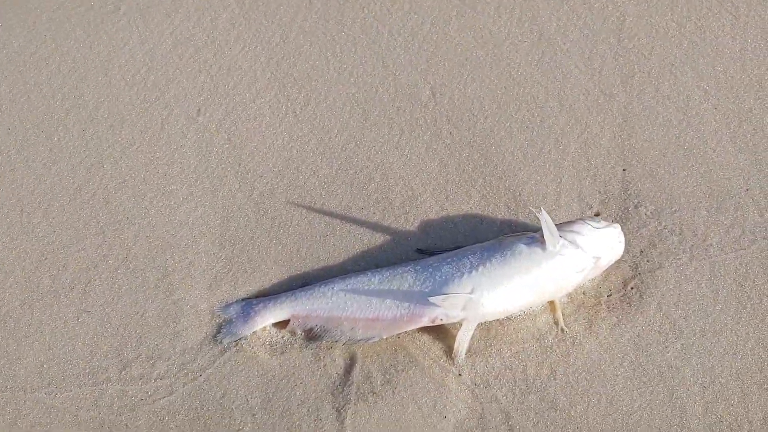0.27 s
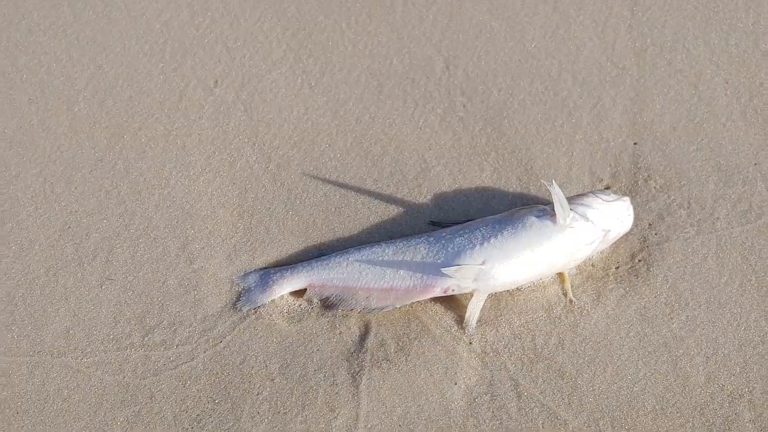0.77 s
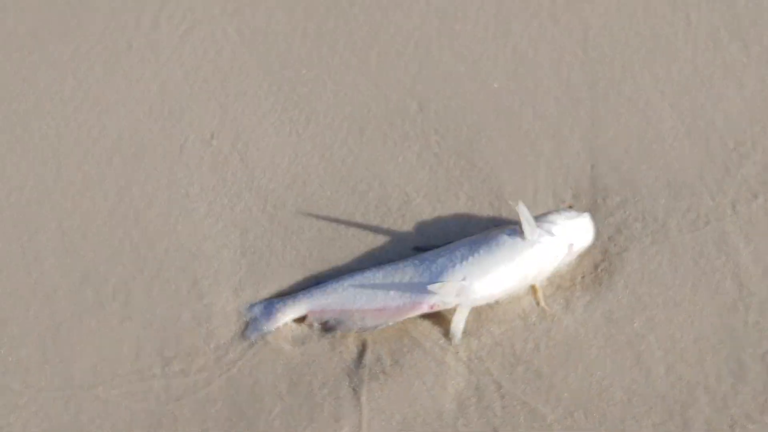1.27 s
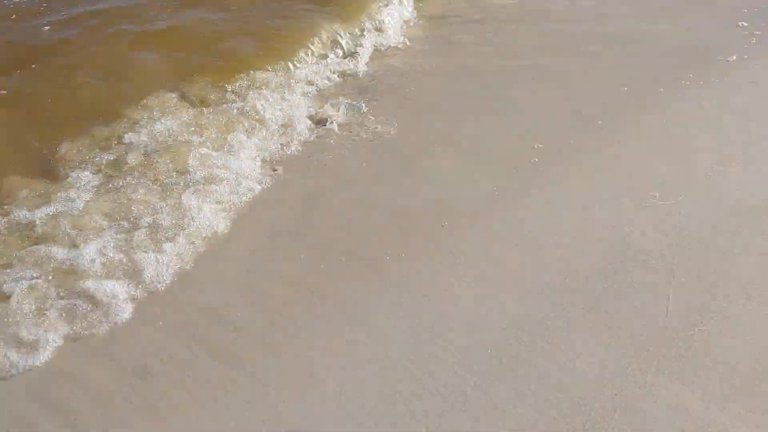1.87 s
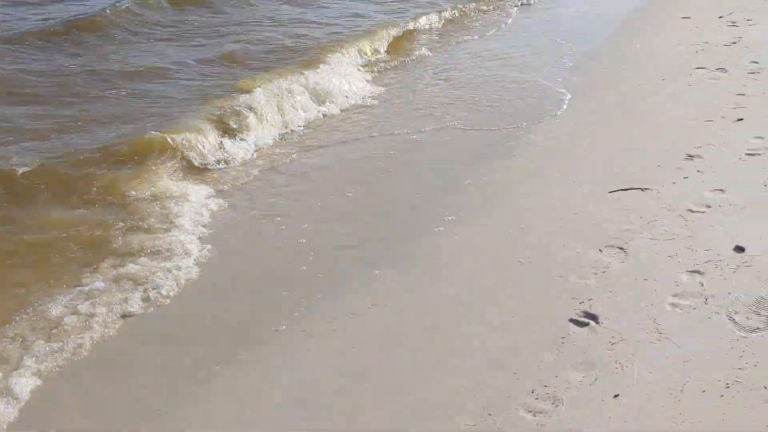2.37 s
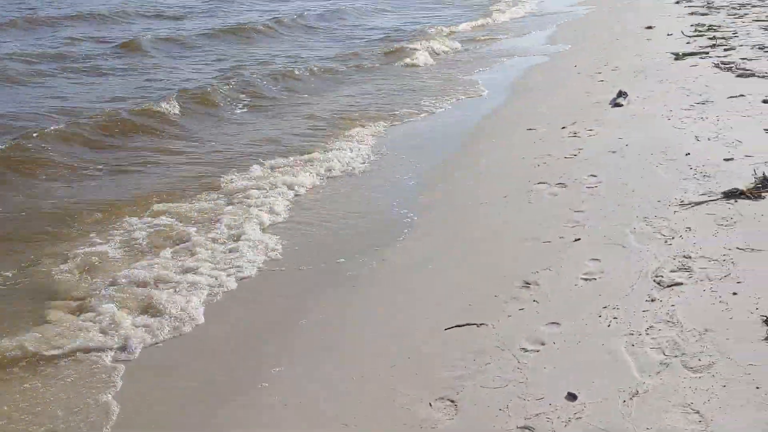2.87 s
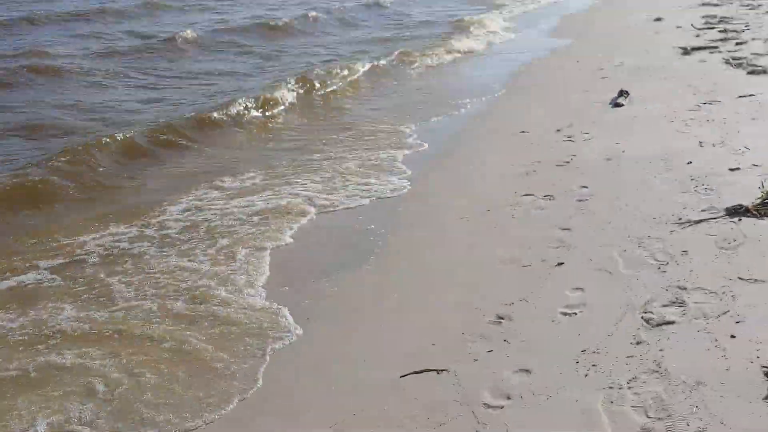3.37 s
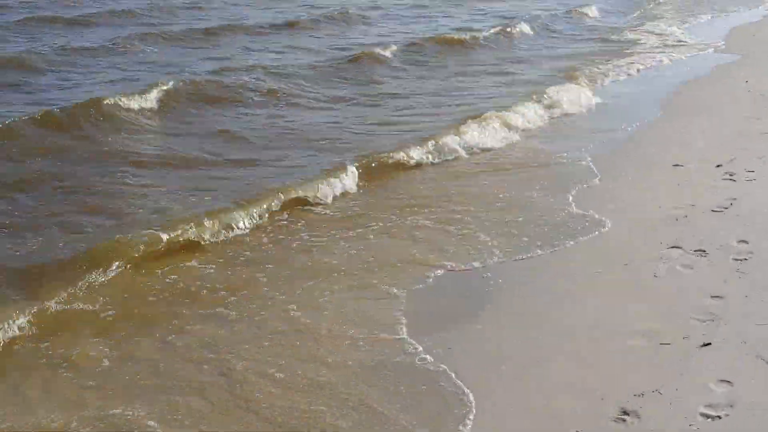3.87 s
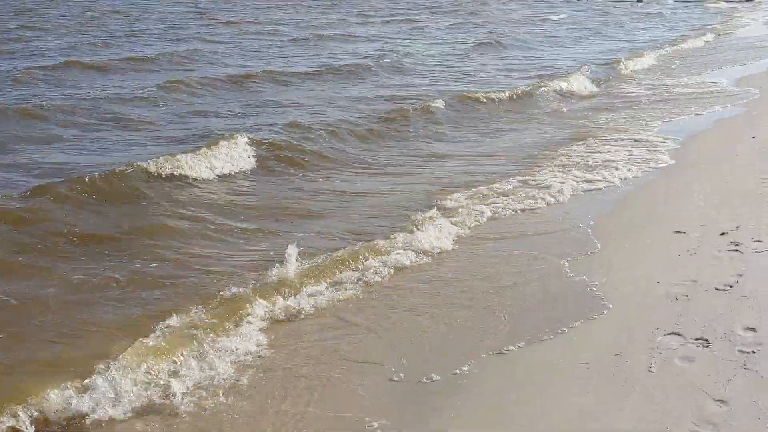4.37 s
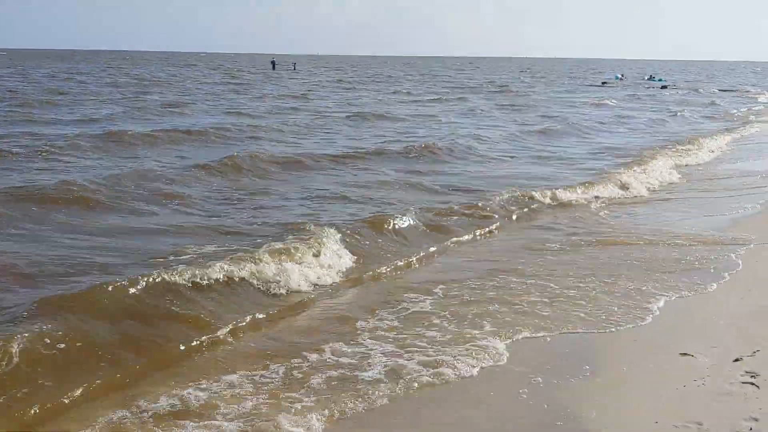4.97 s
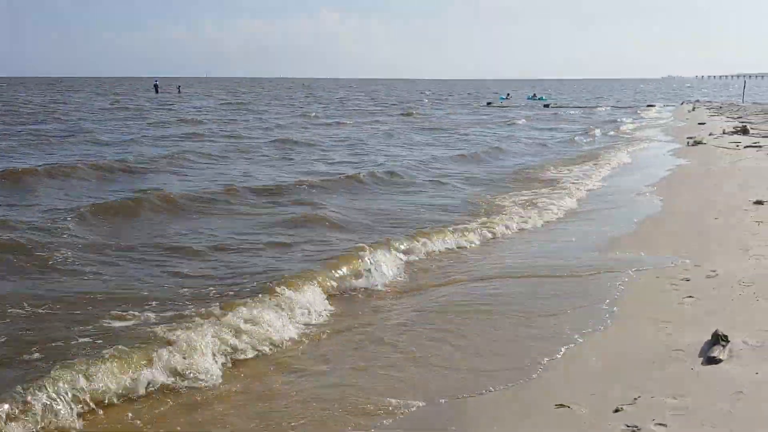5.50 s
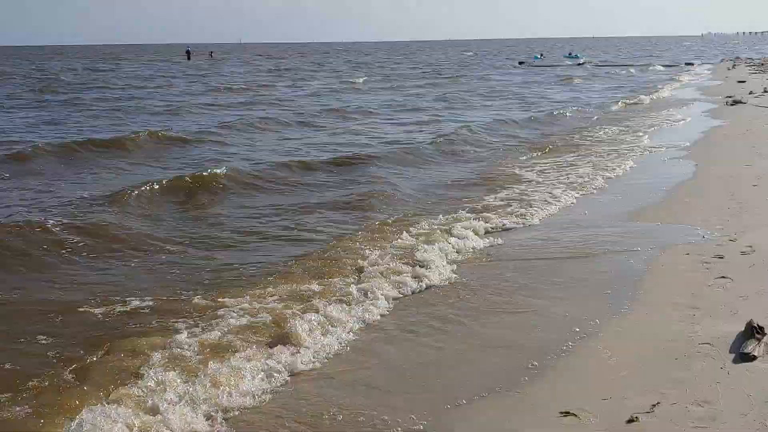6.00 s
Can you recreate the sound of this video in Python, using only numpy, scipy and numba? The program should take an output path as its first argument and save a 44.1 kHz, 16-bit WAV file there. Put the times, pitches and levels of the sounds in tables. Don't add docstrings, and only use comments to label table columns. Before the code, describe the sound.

Small waves break and fizz up a sandy beach in quick overlapping washes, while wind thumps and buffets the microphone, strongest after the middle.

```python
import sys
import numpy as np
from scipy import signal
from scipy.fft import rfft, irfft
from scipy.io import wavfile
from scipy.ndimage import uniform_filter1d, map_coordinates
from numba import njit

SR = 44100
rng = np.random.default_rng(int(sys.argv[2]) if len(sys.argv) > 2 else 0)


def digitize_waveform(pressure):
    field = np.atleast_2d(pressure).T
    bounded = np.clip(field, -1, 1)
    quanta = np.round(bounded * 32767).astype(np.int16)
    wavfile.write(sys.argv[1], SR, quanta)


def attenuation_scalar(level_db):
    decades = np.asarray(level_db, float) / 20
    return 10 ** decades


N = 275184

# crest t/s, length/s, foam level/dB, force/dB (drives plunge and spray), share breaking close by [0-1]
WAVES = [(0.067, 0.5, -21, -5.5, 0.18), (0.93, 0.043, -41.5, 10.5, 0.4), (1.035, 0.14, -28, 0.5, 0.77),
         (1.246, 0.15, -25.5, -1.5, 0.3), (1.436, 0.14, -20, -8.5, 0.5), (1.72, 0.42, -25.5, -6.5, 0.91),
         (2.147, 0.21, -25, -6.5, 0.89), (2.484, 0.2, -27.5, -4, 0.62), (2.761, 0.19, -35.5, 3, 0.8),
         (3.182, 0.12, -27, -14, 0.76), (3.45, 0.33, -26.5, -15, 0.58), (3.87, 0.28, -29.5, 0.5, 0.6),
         (4.35, 0.51, -31, 1.5, 0.78), (4.735, 0.18, -32, 1, 0.4), (5.076, 0.19, -28.5, 1, 0.38),
         (5.393, 0.21, -32, 2.5, 0.52), (5.624, 0.19, -39.5, 2, 0.6), (5.845, 0.32, -30.5, 5.5, 0.54),
         (6.12, 0.19, -35.5, 5.5, 1)]
# t/s, right echo delay/ms, left echo delay/ms, left echo strength [0-1]
LIFT = [(0, 2.4, 2.6, .15), (1.25, 2.33, 2.5, .25), (1.5, 1.9, 2.2, .45), (1.75, 1.27, 1.55, .6),
        (2.0, .9, 1.22, .7), (2.2, .72, 1.04, .7), (2.36, .64, .82, .75), (2.52, .6, .73, .75),
        (2.75, .55, .76, .6), (3.0, .46, .75, .55), (3.3, .48, .76, .4), (3.7, .49, .76, .4),
        (4.1, .47, .77, .6), (4.5, .46, .73, .55), (5.1, .45, .74, .5), (5.5, .43, .77, .45),
        (5.9, .44, .76, .75)]
# t/s, peak level/dB, f/Hz
AIR_POCKETS = [
    (0.631, -22.5, 570),
    (0.988, -22.5, 516),
    (1.126, -13, 2210),
    (1.29, -21.5, 537),
    (1.32, -17, 603),
    (1.359, -18.5, 848),
    (1.409, -18, 454),
    (1.744, -24, 1330),
    (1.797, -24, 934),
    (1.989, -28.5, 770),
]
# t/s, peak level/dB, f/Hz
SPRAY_DROPS = [
    (.825, -0.5, 5000),
    (.868, 2, 6210),
    (1.058, -4, 4570),
    (1.07, 12, 11000),
    (1.268, 0, 4300),
    (1.299, 4, 4570),
    (1.372, -8, 11000),
    (1.618, 11, 11000),
    (3.623, 7.5, 6270),
]
# f/Hz, level/dB
LEFT_PORT = [(170, 0.5), (330, -2.5), (600, 1), (950, -0.5), (1350, -2.5), (1900, -3.5), (2500, -5.5),
             (3300, -8.5), (4000, -11.5), (5200, -12), (6100, -14), (7000, -24), (7800, -22), (8400, -43),
             (8900, -32), (9300, -33), (9800, -20.5), (10400, -33), (11000, -23), (12100, -21.5),
             (12600, -40), (14100, -34), (15100, -38)]
RIGHT_PORT = [(170, -8), (350, -7), (650, -2.5), (1250, -2), (1900, 6.5), (2700, 3), (3500, 1.5),
              (4800, -8), (6200, -13), (7000, -8.5), (8600, -31.5), (9800, -32.5), (10400, -25.5),
              (11000, -22.5), (12100, -32), (12700, -40), (14100, -32), (15100, -41)]
# f/Hz, level/dB
EDDY_RESPONSE = [(20, -11.5), (40, -1), (70, 0.5), (300, 3.5), (1000, -47.5)]
# t/s, length/s, buffet level/dB, small eddies re all/dB
LEFT_GUSTS = [(0.2, 0.11, -30.5, -7), (0.496, 0.11, -36.5, -8.5), (.9, 0.061, -33, -11),
              (1.07, 0.035, -24, -10.5), (1.2, 0.04, -24.5, -9.5), (1.424, 0.11, -26, -6.5),
              (1.607, .07, -29.5, -6), (1.74, 0.052, -32, -4.5), (1.95, 0.056, -29, -14.5),
              (2.404, 0.3, -31, -16), (2.71, 0.059, -27, -13), (3.05, 0.19, -29, -14.5),
              (3.27, .05, -31, -10.5), (3.684, 0.059, -25, -8.5), (3.78, .07, -21, -13),
              (3.98, 0.16, -17.5, -8), (4.454, 0.17, -20.5, -11.5), (4.69, 0.054, -28.5, -4),
              (4.85, 0.069, -18.5, -9), (5.037, 0.052, -17.5, -4.5), (5.132, 0.058, -12.5, -0.5),
              (5.36, 0.18, -19, -11), (5.94, 0.17, -19.5, -7.5), (6.195, 0.055, -27, -4)]
RIGHT_GUSTS = [(1.42, 0.088, -27.5, 6.5), (1.72, 0.032, -32, -1), (1.83, .04, -34, -18),
               (2.16, 0.11, -32.5, -2), (2.3, 0.039, -28, 5), (2.449, 0.062, -30.5, -2),
               (2.58, 0.12, -24, -12), (2.8, 0.098, -27, -7.5), (3.002, 0.07, -22, -7.5),
               (3.21, 0.055, -21.5, -9), (3.3, 0.068, -26, 0), (3.42, 0.2, -22.5, -15),
               (3.62, 0.1, -26.5, -9), (3.82, 0.07, -22, -11.5), (4.2, 0.31, -24.5, -8.5),
               (4.7, .2, -23, -9.5), (4.92, 0.034, -19, -12.5), (5.08, 0.072, -14, -1.5),
               (5.25, 0.038, -19, -5.5), (5.48, 0.35, -21, -10), (5.95, 0.17, -27, -7),
               (6.2, 0.11, -24, -9)]
# t/s, peak level/dB, f/Hz
LEFT_SLAPS = [(0.174, -11, 99), (0.756, -15, 89), (0.923, -14, 79), (1.063, -11, 109), (1.093, -13, 100),
              (1.177, -8.5, 110), (1.474, -14, 150), (1.569, -9, 99), (1.597, -14, 140), (1.635, -10, 129),
              (1.667, -12, 118), (1.722, -14, 129), (1.932, -19, 89), (2.081, -11, 171), (2.435, -15, 150),
              (2.946, -18, 110), (3.179, -14, 130), (3.323, -23, 130), (3.651, -16, 120), (3.736, -8, 110),
              (3.833, -6, 140), (3.899, -1, 151), (4.0, -2, 159), (4.044, -0.5, 119), (4.127, -3, 162),
              (4.184, -15, 110), (4.347, -6, 111), (4.445, -5, 138), (4.612, -10, 111), (4.858, -15, 140),
              (4.933, -4, 150), (5.005, -3, 192), (5.048, 0.5, 211), (5.149, -4, 230), (5.248, -8, 130),
              (5.339, -7, 152), (5.788, -15, 160), (5.849, -7, 180), (6.181, -2.5, 169)]
RIGHT_SLAPS = [(0.328, -20, 200), (1.461, -13, 250), (1.699, -19, 200), (1.803, -22, 92), (2.079, -10, 191),
               (2.174, -18, 90), (2.206, -17, 120), (2.457, -20, 80), (2.589, -17, 90), (2.765, -10, 90),
               (2.827, -12, 69.6), (3.028, -12, 150), (3.197, -12, 89), (3.23, -19, 160),
               (3.38, -7.5, 59.5), (3.415, -15, 70), (3.643, -15, 80), (3.768, -6, 90.5), (3.875, -12, 80),
               (4.426, -11, 190.8), (4.692, -15, 100), (4.925, -7, 90), (5.071, -5.5, 190),
               (5.241, -6, 222), (5.29, -12, 100), (5.533, -15, 90), (5.653, -7.5, 132), (6.141, -10, 139),
               (6.189, -15, 120)]
# t/s, length/s, centre f/Hz, right level/dB, left re right/dB
RAFTS = [(1.3, .1, 2300, -34, -3), (1.31, 0.09, 2350, -28.5, -8), (1.68, 0.092, 1150, -41, 10),
         (2.303, 0.058, 360, -30.5, 3), (2.49, 0.22, 1930, -23.5, -28), (2.65, 0.14, 4800, -33.5, -18),
         (2.88, 0.1, 460, -32, -2), (3.89, 0.24, 4400, -29.5, -15), (4.22, 0.23, 2240, -29, -10),
         (4.43, .15, 5100, -35, -6), (5.35, 0.13, 3300, -29.5, -9), (1.73, 0.036, 3200, -41, -10),
         (1.1, 0.19, 1200, -39, 3.5), (0.93, 0.057, 3360, -33, -9), (2.8, 0.084, 3900, -42, 1),
         (5.82, .12, 3100, -41, 4), (4.9, 0.25, 3150, -28, -13), (4.653, 0.14, 2400, -37, -9),
         (5.05, 0.089, 1850, -28, -9), (5.604, 0.11, 600, -26, -0.5), (5.7, 0.11, 3600, -27, -16),
         (5.852, 0.075, 2180, -25, -12), (5.847, .12, 6200, -29, -13), (5.9, 0.21, 1330, -38, 7.5),
         (6.08, 0.1, 3300, -31, -18)]

FALL_OVER_RISE = 0.9
PLUNGE_SPAN, SPRAY_SPAN = 0.73, 0.92
PLUNGE_PER_FORCE, SPRAY_PER_FORCE = 0.91, 0.98
FAR_PLUNGE_DB, FAR_FOAM_DB, FAR_SPRAY_DB = -35, -40, -39
PLUNGE_DB, SPRAY_DB = (-10, 3.5), (-1, -0.5)
PLUNGE_PAN_DB, FOAM_PAN_DB, SPRAY_PAN_DB = (-10, -1.9), (-1.5, 1.5), (3.5, 0.5)
BREAKER_LEAD_MS, WASH_LEAD_MS = (.17, .12), (.46, .41)
SHADOW_HZ = (2800., 1700.)
BREAKER_ECHO, WASH_ECHO = (.45, 1.15), (.1, .05)
SCATTERED = (.2, .22)
ECHO_CORNER_TURNS, ECHO_TOP_HZ = (.5, .12), 4200.
SHADOW_DELAY_MS, CLOTH_DELAY_MS = .08, .05


@njit
def svf(x, hz, damp):
    low, band = np.empty(len(x)), np.empty(len(x))
    b, l = 0., 0.
    for i in range(len(x)):
        g = np.tan(np.pi * hz[i] / SR)
        v = (b + g * (x[i] - l)) / (1 + g * (g + damp))
        low[i], band[i] = l + g * v, damp * v
        b, l = 2 * v - b, l + 2 * g * v
    return low, band


@njit
def bubbles(start, hz, cycles, size, glide):
    out = np.zeros(N)
    for k in range(len(start)):
        tau = cycles[k] * SR / hz[k] / 3
        phase = 0.
        for i in range(min(int(5 * tau), N - start[k])):
            phase += 2 * np.pi * hz[k] / SR * (1 + glide * i / tau)
            envelope = (1 - np.exp(-6 * i / tau)) * np.exp(-i / tau)
            out[start[k] + i] += size[k] * np.sin(phase) * envelope
    return out


def unit(x):
    return x / np.sqrt(np.mean(x ** 2))


def curves(table):
    s, *columns = np.transpose(table)
    return [np.interp(np.arange(N) / SR, s, c) for c in columns]


def walk(rate_hz):
    k = int(SR / rate_hz)
    held = np.repeat(rng.standard_normal(N // k + 1), k)
    return uniform_filter1d(uniform_filter1d(held, k), k)[:N]


def colour(x, table, size=2048):
    hz, db = np.transpose(table)
    grid_hz = np.arange(size // 2 + 1) * SR / size
    gain_db = np.interp(np.log(grid_hz + 1), np.log(hz), db)
    cep = irfft(np.log(attenuation_scalar(gain_db)))
    cep[1:size // 2] *= 2
    cep[size // 2 + 1:] = 0
    return signal.fftconvolve(x, irfft(np.exp(rfft(cep))))[:N]


def delay(x, ms):
    return map_coordinates(x, [np.arange(N) - ms * SR / 1000], order=3)


def swell(s, length_s, fall=0.92):
    late = np.arange(N) / SR - s[:, None]
    width = length_s[:, None] * np.where(late > 0, fall, 1)
    return np.exp(-(late / width) ** 2)


def total_db(db, shape, floor_db):
    return 10 * np.log10(attenuation_scalar(2 * db) @ shape + attenuation_scalar(2 * floor_db))


def lifted(echo_ms, pair):
    return np.interp(np.log(echo_ms), np.log([.5, 2.3]), pair[::-1])


def foam(fizz_db, patchy_db, count=60000):
    when, pitch, ring, rarity = rng.random((count, 4)).T
    hz = 300 + 13000 * pitch ** 1.53
    size = attenuation_scalar(-2.6 * np.log(rarity + .002))
    fizz = unit(bubbles((when * N).astype(np.int64), hz, 3 + 0.96 * ring, size, 0.043))
    layers, together = np.zeros((3, N)), walk(30)
    for band_hz in 130 * 2 ** np.arange(0, 7.1, 1 / 2):
        source = rng.standard_normal(N) + attenuation_scalar(fizz_db) * fizz
        band = svf(source, np.full(N, band_hz), .5)[1]
        flicker = min(band_hz / 5000, 1.2) * together + .5 * walk(9)
        band *= attenuation_scalar(patchy_db * flicker)
        place = np.interp(np.log(band_hz), np.log([700, 1300, 2900, 7500]), [0, 1, 1, 2])
        weight = np.clip(1 - abs(place - np.arange(3)), 0, 1)
        layers += weight[:, None] ** .5 * band
    return layers


def waves(echo_ms):
    s, length_s, db, force_db, share = np.transpose(WAVES)
    plunge_shape, foam_shape, spray_shape = (swell(s, length_s * span, FALL_OVER_RISE)
                                             for span in (PLUNGE_SPAN, 1, SPRAY_SPAN))
    plunge_db = total_db(db + PLUNGE_PER_FORCE * force_db, plunge_shape, FAR_PLUNGE_DB)
    foam_db = total_db(db, foam_shape, FAR_FOAM_DB)
    spray_db = total_db(db + SPRAY_PER_FORCE * force_db, spray_shape, FAR_SPRAY_DB)
    plunge_db += lifted(echo_ms, PLUNGE_DB)
    spray_db += lifted(echo_ms, SPRAY_DB)
    weight = attenuation_scalar(2 * db)[:, None] * foam_shape + 1e-12
    near_share = np.clip(share @ weight / weight.sum(axis=0), 0, 1)
    return np.array([plunge_db, foam_db - 3, spray_db + 13.5]), near_share


def at_left_port(direct, echo_ms, left_ms, left_echo):
    turns = np.interp(echo_ms, [.47, .56], ECHO_CORNER_TURNS)
    low, band = svf(direct, 1000 * turns / left_ms, 1.4)
    reflected = svf(direct - low - band, np.full(N, ECHO_TOP_HZ), 1.4)[0]
    return direct + left_echo * delay(reflected, left_ms - CLOTH_DELAY_MS)


def at_right_port(near, along, echo_ms, echo):
    lead_ms, wash_ms = lifted(echo_ms, BREAKER_LEAD_MS), lifted(echo_ms, WASH_LEAD_MS)
    shadow_hz = lifted(echo_ms, SHADOW_HZ)
    dull_near, dull_along = (svf(v, shadow_hz, 1.5)[0] for v in (near, along))
    bent = delay(dull_near, lead_ms - SHADOW_DELAY_MS)
    late = delay(near, echo_ms + lead_ms)
    wash_late = delay(dull_along, wash_ms + echo_ms - SHADOW_DELAY_MS)
    return bent + echo * late + delay(along, wash_ms) + lifted(echo_ms, WASH_ECHO) * wash_late


def surf():
    echo_ms, left_ms, left_echo = curves(LIFT)
    level_db, share = waves(echo_ms)
    pan_db = np.array([lifted(echo_ms, pair) for pair in (PLUNGE_PAN_DB, FOAM_PAN_DB, SPRAY_PAN_DB)])
    echo = lifted(echo_ms, BREAKER_ECHO)
    loose = np.array([.12, .4, 1.8])[:, None] * lifted(echo_ms, SCATTERED)
    breaker, wash = foam(fizz_db=-2.5, patchy_db=2.5), foam(fizz_db=-2.5, patchy_db=0.0)
    pops = single_bubbles()
    out = []
    for side, port in enumerate((LEFT_PORT, RIGHT_PORT)):
        gain = attenuation_scalar(level_db - side * pan_db)
        coherent = gain * np.sqrt(1 - loose)
        near = (coherent * breaker).sum(axis=0) * np.sqrt(share / (1 + echo ** 2)) + pops
        along = (coherent * wash).sum(axis=0) * np.sqrt(1 - share)
        if side:
            heard = at_right_port(near, along, echo_ms, echo)
        else:
            heard = at_left_port(near + along, echo_ms, left_ms, left_echo)
        spread = foam(fizz_db=-1.5, patchy_db=2.5)
        scattered = (gain * np.sqrt(loose) * spread).sum(axis=0)
        out.append(colour(heard + scattered, port))
    return np.array(out)


def rumble():
    hz = np.full(N, 90.5)
    once = svf(rng.standard_normal(N), hz, 0.92)[1]
    return attenuation_scalar(-38) * unit(svf(once, hz, 0.92)[1])


def gusts(table, breeze_db, breeze_small_db=-9.5):
    s, length_s, db, small_db = np.transpose(table)
    power, breeze = attenuation_scalar(2 * db)[:, None] * swell(s, length_s), attenuation_scalar(2 * breeze_db)
    total = power.sum(axis=0) + breeze
    return 10 * np.log10(total), (small_db @ power + breeze_small_db * breeze) / total


def wind():
    out = []
    for table, breeze_db, lumpy_db in ((LEFT_GUSTS, -32.5, 3.0), (RIGHT_GUSTS, -38.5, 2.0)):
        gust_db, small_db = gusts(table, breeze_db)
        eddies = rng.standard_normal(N) * attenuation_scalar(lumpy_db * walk(34))
        corner_hz = np.clip(130 * attenuation_scalar(1.3 * (small_db + 9.5) + 1.3 * walk(13)), 30, 2000)
        rolled = svf(eddies, corner_hz, 1.42)[0]
        rolled = svf(rolled, 2.44 * corner_hz, 1.0)[0] / np.sqrt(corner_hz)
        out.append(unit(colour(rolled, EDDY_RESPONSE, size=8192)) * attenuation_scalar(gust_db + 3.0))
    return np.array(out)


def slaps(table, half_length_cycles=0.62):
    out = np.zeros(N)
    phase = np.pi + rng.standard_normal((len(table), 1))
    s, db, hz = np.transpose(table)[:, :, None]
    span = np.arange(-2048, 2048)
    turns = hz * span / SR
    swing = np.exp(-(turns / half_length_cycles) ** 2) * np.cos(2 * np.pi * turns + phase)
    index = np.clip((s * SR).astype(np.int64) + span, 0, N - 1)
    np.add.at(out, index, attenuation_scalar(db) * swing)
    return out


def single_bubbles():
    s, db, hz = np.transpose(AIR_POCKETS + SPRAY_DROPS)
    pocket = hz < 2800
    cycles = np.where(pocket, 24., 5.)
    return bubbles((s * SR).astype(np.int64), hz, cycles, attenuation_scalar(db + np.where(pocket, 5, 0)), 0.006)


def rafts(spread=.2, lead_ms=.42):
    s, length_s, hz, db, left_db = np.transpose(RAFTS)
    hiss = []
    for f in hz:
        centre_hz = np.full(N, f)
        once = svf(rng.standard_normal(N), centre_hz, spread)[1]
        hiss.append(unit(svf(once, centre_hz, 2 * spread)[1]))
    hiss = np.array(hiss) * np.sqrt(swell(s, length_s, FALL_OVER_RISE))
    return np.array([attenuation_scalar(db + left_db) @ hiss, delay(attenuation_scalar(db) @ hiss, lead_ms)])


def scene():
    port_slaps = np.array([slaps(LEFT_SLAPS), slaps(RIGHT_SLAPS)])
    return surf() + rumble() + wind() + port_slaps + rafts()


def roll_off(x):
    return signal.sosfilt(signal.butter(12, 15740, fs=SR, output="sos"), x)


def record(dry):
    rounded = np.tanh(.9 * dry) / .9
    return roll_off(rounded)


dry = scene()
out = record(dry)
digitize_waveform(out)
```